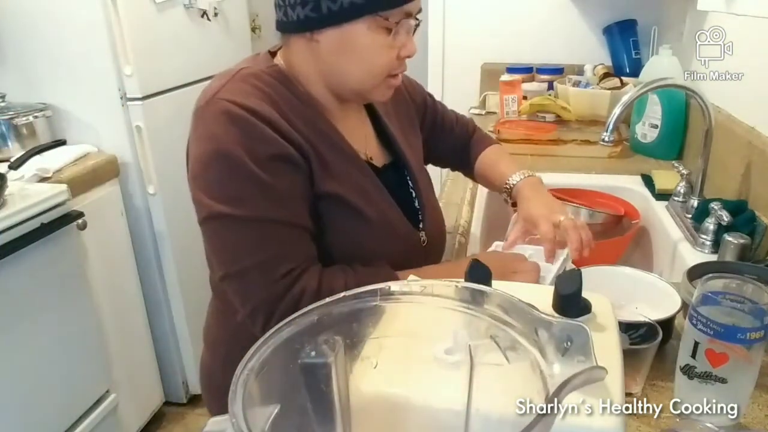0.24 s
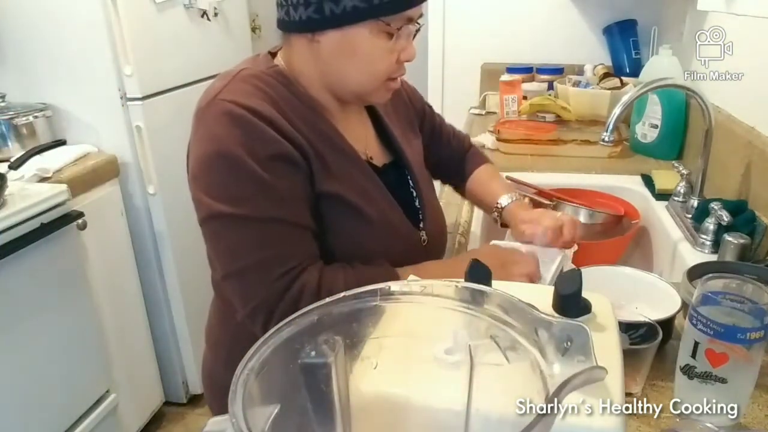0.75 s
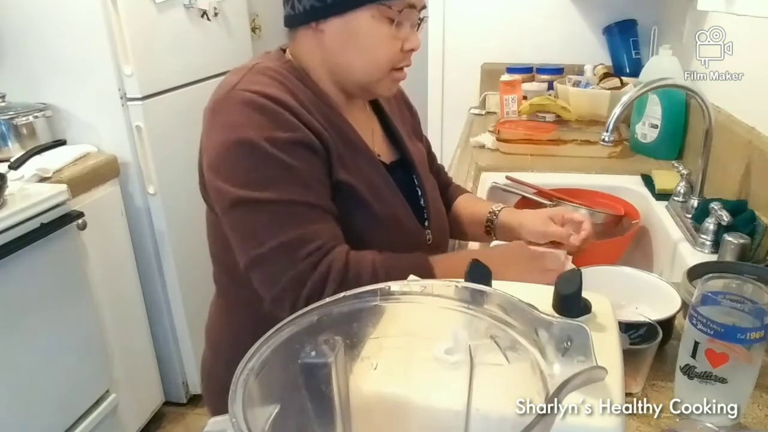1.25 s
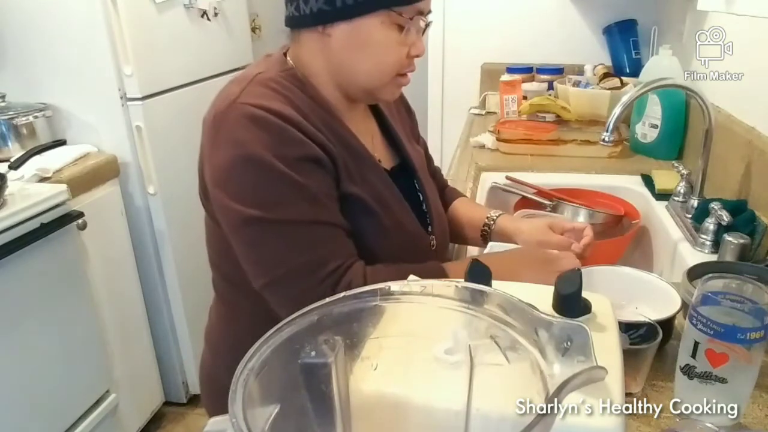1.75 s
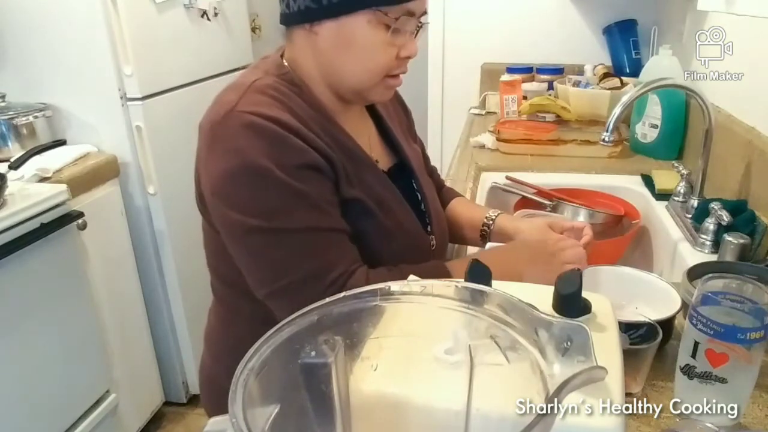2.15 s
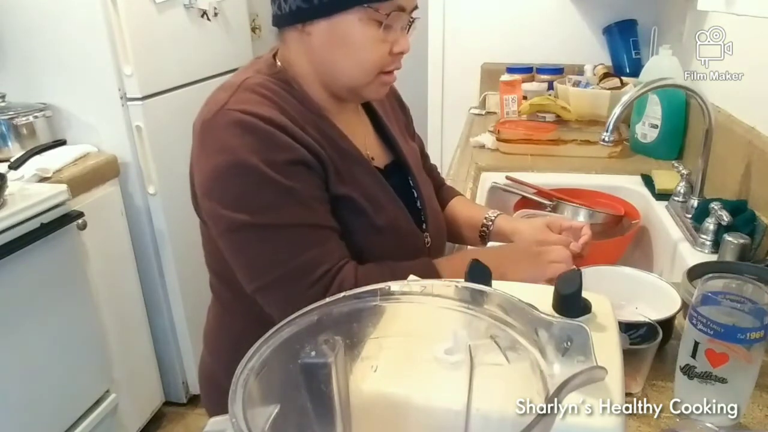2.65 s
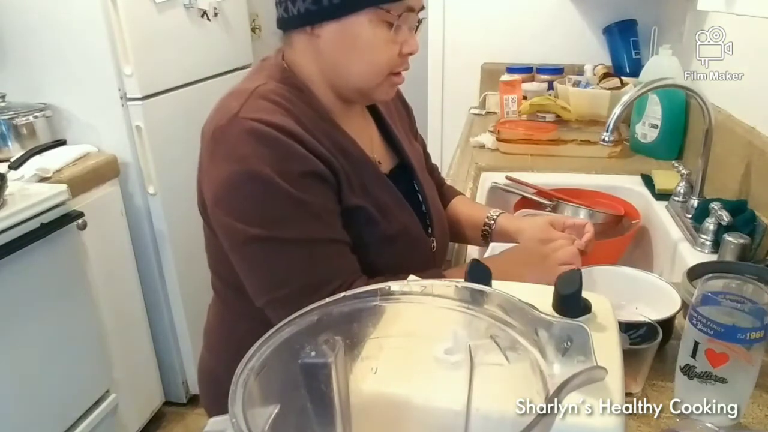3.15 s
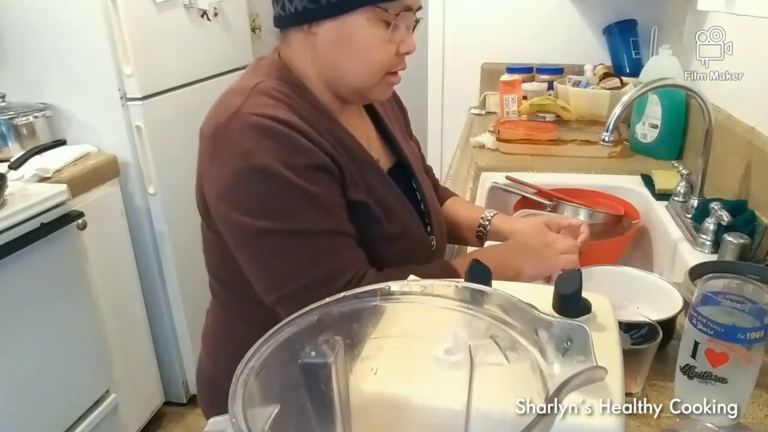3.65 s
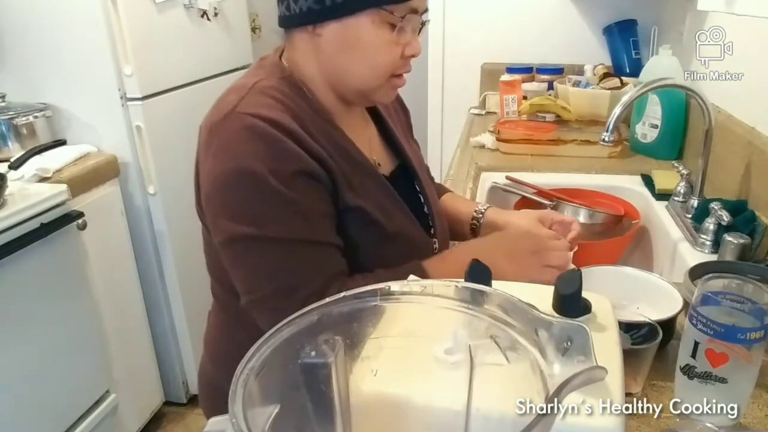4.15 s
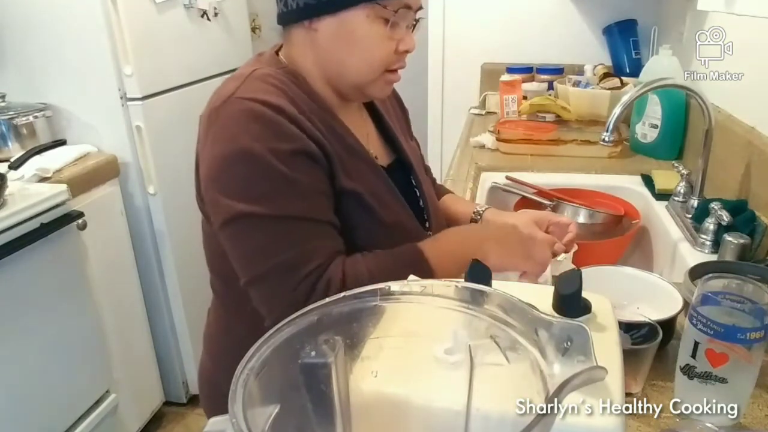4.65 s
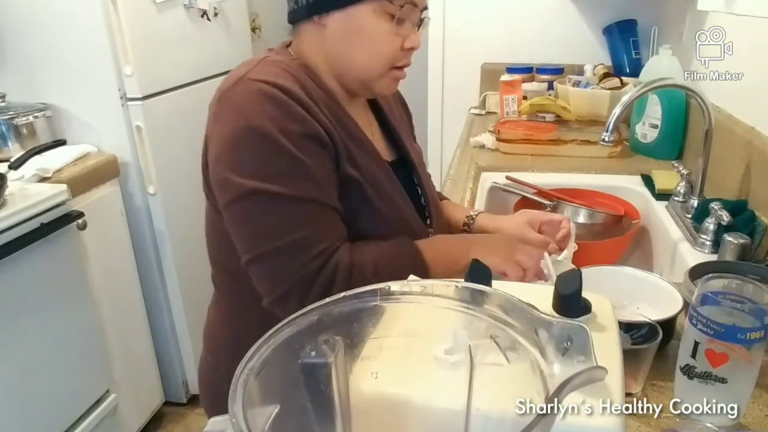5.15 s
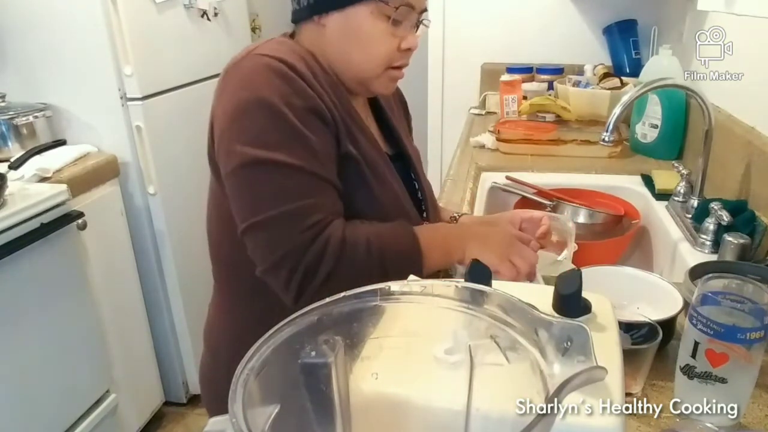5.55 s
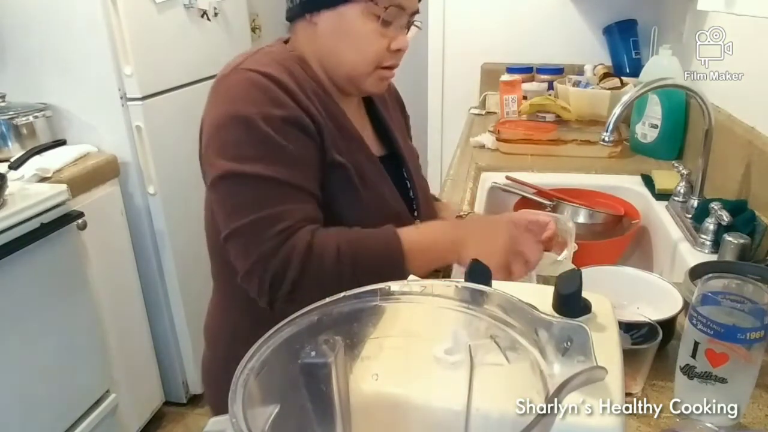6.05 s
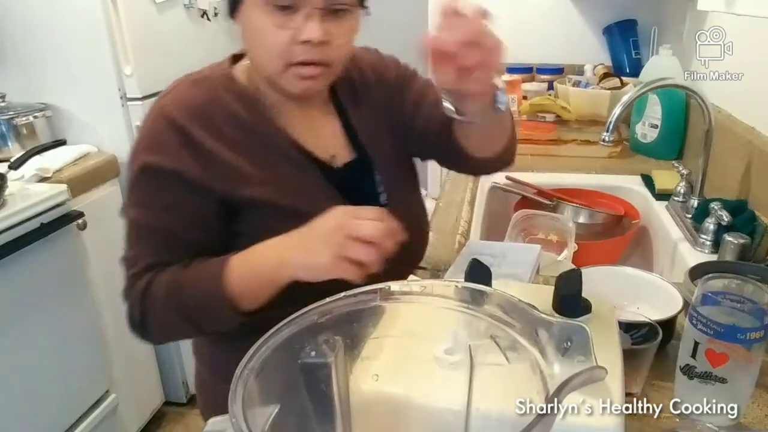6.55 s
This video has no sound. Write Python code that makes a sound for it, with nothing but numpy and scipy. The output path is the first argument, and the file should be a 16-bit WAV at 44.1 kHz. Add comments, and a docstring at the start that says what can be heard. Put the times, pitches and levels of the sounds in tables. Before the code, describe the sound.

Ice cubes crack and snap loose as a plastic tray is twisted by hand over a sink in a small, hard-walled kitchen.

```python
"""Twisting an ice tray over a sink

A plastic ice tray is twisted over a kitchen sink: cubes crack loose in snaps and short stick-slip runs.
Each crack is a train of broadband clicks that rings damped modes of a cube and of the tray.
Reflections of the small hard room outweigh the direct clicks; once, the tray gives way with a hollow bump.
Fingers grip and rub the frosty plastic in sparse random grains, over a faint hiss of filtered noise.
A noise gate turns the quietest moments down, and a low-pass limits the band."""
import sys
import numpy as np
from scipy import signal
from scipy.fft import rfft, irfft, next_fast_len
from scipy.io import wavfile
from scipy.ndimage import uniform_filter1d

SR = 44100
rng = np.random.default_rng(int(sys.argv[2]) if len(sys.argv) > 2 else 0)


def store_pcm(level_fs):
    """Save levels as 16-bit WAV."""
    pcm = np.round(np.clip(level_fs, -1, 1) * 32767).astype(np.int16)
    wavfile.write(sys.argv[1], SR, np.atleast_2d(pcm).T)


N = 300551  # length in samples


def amp(db):
    """Level to amplitude: 20 dB is a factor of ten."""
    return 10 ** (np.asarray(db) / 20)


def unit(x):
    """Power normalisation: x at rms 1."""
    return x / np.sqrt(np.mean(x ** 2) + 1e-20)


def unit_energy(x):
    """Energy normalisation: x with a sum of squares of 1."""
    return x / np.sqrt(np.sum(x ** 2) + 1e-20)


def along(points, hz):
    """Logarithmic frequency scale: (Hz, value) points interpolated over log frequency."""
    point_hz, value = np.transpose(points)
    return np.interp(np.log(hz + 1), np.log(point_hz + 1), value)


def coloured(x, spectrum, size=4096):
    """Minimum-phase filtering: folding the cepstrum gives this spectrum a causal response."""
    level_db = along(spectrum, np.fft.rfftfreq(size, 1 / SR))
    cepstrum = irfft(np.log(amp(np.maximum(level_db, -100))))
    cepstrum[1:size // 2] *= 2
    cepstrum[size // 2 + 1:] = 0
    response = irfft(np.exp(rfft(cepstrum)))
    return signal.fftconvolve(x, response)[:len(x)]


# Spectrum of the quiet room, relative: frequency_hz [Hz], density_db [dB per Hz]
HISS_SPECTRUM = [(30, -14.5), (200, 3), (3000, -15), (8000, -14), (13000, -31)]


def hiss(level_db=-73):
    """Stationary noise: random pressure filtered to the spectrum of the quiet room."""
    return amp(level_db) * unit(coloured(rng.standard_normal(N), HISS_SPECTRUM))


# Reverberation time of the kitchen: frequency_hz [Hz], t60_s [s]
ROOM_DECAY = [(150, 0.47), (500, 0.24), (1100, 0.29), (2800, 0.26), (8000, 0.25)]


def kitchen(size=256):
    """Diffuse reverberation: a fresh noise tail in which each frequency decays at its own rate."""
    hz = np.fft.rfftfreq(size, 1 / SR)
    t = np.arange(SR // size + 1) * size / 2 / SR  # frames half a window apart
    shape = (len(hz), len(t))
    noise = rng.standard_normal(shape) + 1j * rng.standard_normal(shape)
    decay = amp(-60 * t / along(ROOM_DECAY, hz)[:, None])
    return unit_energy(signal.istft(noise * decay, nperseg=size)[1])


# Grips of the fingers on the tray: start_s [s], length_s [s], level_db [dB]
FINGER_GRIPS = [(-0.03, 0.82, -55.5), (0.858, 0.14, -53.5), (1.129, 0.14, -62), (1.314, 0.64, -57),
                (2.063, 0.59, -56.5), (2.773, 0.17, -56), (3.1, 0.14, -60), (3.335, 0.946, -61.5),
                (4.464, 0.19, -59.5), (4.77, 0.81, -53.5), (5.56, 1.1, -61)]


def grip(t, attack_s=0.016, ease_db_per_s=5.5, release_db_per_s=164):
    """Amplitude envelope: each grip takes hold quickly, eases while it lasts and lets go."""
    envelope = 0
    for start_s, length_s, level_db in FINGER_GRIPS:
        since = t - start_s
        attack = np.clip(since / attack_s, 0, 1)
        release_db = release_db_per_s * np.maximum(since - length_s, 0)
        envelope = envelope + attack * amp(level_db - ease_db_per_s * since - release_db)
    return envelope


# Spectrum of the rubbing, relative: frequency_hz [Hz], density_db [dB per Hz]
FROST_SPECTRUM = [(50, -18), (130, -3), (350, 2.5), (1400, -1.5), (2300, 0), (4200, -9.5), (8000, -5.5),
                  (12500, -29)]


def rubbing(rate_per_s=500, spread_db=4, dry_db=-12, catch_hz=45, catch_db=3.5):
    """Friction as random micro-slips of skin and frost, bunched where fingers catch, blurred by the room."""
    t = np.arange(N) / SR
    catches = np.interp(t * catch_hz, np.arange(N), rng.standard_normal(N))  # slow random swell
    size = amp(spread_db * rng.standard_normal(N) + catch_db * catches)
    slips = rng.random(N) < rate_per_s / SR
    grains = slips * rng.standard_normal(N) * size
    heard = amp(dry_db) * grains + signal.fftconvolve(grains, kitchen())[:N]
    return grip(t) * unit(coloured(heard, FROST_SPECTRUM))


def flex(start_s=0.553, hz=208, t60=0.083, level_db=-12):
    """Damped resonance with a gradual onset: the twisted tray gives way once with a hollow bump."""
    t = np.maximum(np.arange(N) / SR - start_s, 0)
    return amp(level_db) * unit_energy(t * amp(-60 * t / t60) * np.sin(2 * np.pi * hz * t))


def ring(t, hz, db, t60):
    """Modal superposition: exponentially damped sines, each with db as its share of the energy."""
    hz, db, t60 = np.array(np.broadcast_arrays(hz, db, t60))[:, :, None]
    strength = amp(db - 60 * t / t60) / np.sqrt(t60)  # a longer mode starts softer for the same energy
    return unit_energy(np.sum(strength * np.sin(2 * np.pi * hz * t), axis=0))


# Resonances of the tray: frequency_hz [Hz], level_db [dB, relative energy], t60_s [s]
TRAY_MODES = [(219.4, 6, 0.24), (388.5, -2.5, 0.19), (1000, 3, 0.064), (1158.4, 6, 0.055),
              (1623, -11.5, 0.16), (2087, 7, 0.07), (3214, 9, 0.089)]


def tray_ring(t, scatter_db=3):
    """Modal excitation: the tray's fixed modes are struck at new strengths each time."""
    hz, db, t60 = np.transpose(TRAY_MODES)
    return ring(t, hz, db + scatter_db * rng.standard_normal(len(db)), t60)


def cube_ring(t, low_hz=500, high_hz=11000, count=20, low_t60=0.22, scatter=0.2):
    """Frequency-dependent damping: cube and cell get fresh modes, the high ones mostly dying first."""
    position = (np.arange(count) + rng.random(count)) / count
    hz = low_hz * (high_hz / low_hz) ** position
    share_db = 10 * np.log10(hz)  # high modes lie further apart, so each carries more
    t60 = low_t60 * np.sqrt(low_hz / hz) * np.exp(scatter * rng.standard_normal(count))
    return ring(t, hz, share_db, t60)


def click(early_t60=0.3, early_db=-2, direct_db=-11):
    """Impulse response: direct click, reflections from the near walls of the sink, room tail."""
    tail = kitchen()
    t = np.arange(len(tail)) / SR
    near = rng.standard_normal(len(t))
    near *= np.abs(near) * amp(-60 * t / early_t60)  # a few strong reflections stand out
    return amp(direct_db) * (t == 0) + amp(early_db) * unit_energy(near) + tail


def crack(length, first_db=2.5, soften_db_per_s=200, spread_db=1.5, tray_db=-13, cube_db=-8, count=7):
    """Stick-slip fracture: one break runs on in uneven slips, each with its own reflections."""
    when = (np.arange(count) + rng.random(count) - 1) / (count - 1) * abs(length)
    size_db = spread_db * rng.standard_normal(count)
    when[0], size_db[0] = 0, first_db - soften_db_per_s * length  # long runs creep in, short ones burst
    sound = np.zeros(SR // 2)
    for start, db in zip((when * SR).astype(int), size_db):
        slip = amp(db) * click()[:len(sound) - start]
        sound[start:start + len(slip)] += slip
    sound = unit_energy(sound)
    t = np.arange(SR // 4) / SR
    ringing = amp(tray_db) * tray_ring(t) + amp(cube_db) * cube_ring(t)
    biggest = int(when[np.argmax(size_db)] * SR)
    sound[biggest:][:len(t)] += ringing  # the biggest slip rings cube and tray
    return sound


# Basic spectrum of a crack, relative: frequency_hz [Hz], density_db [dB per Hz]
ICE_SPECTRUM = [(30, -65), (75, -41.5), (120, -19), (210, -14.5), (390, -2.5), (520, -7), (720, -4.5),
                (1100, -2.5), (2250, -3.5), (4000, -14), (6000, -18), (7900, -13), (9500, -22.5),
                (13000, -42), (15500, -44.5)]
# Band in which a splitting cube rings: frequency_hz [Hz], share [0-1]
SPLIT_BAND = [(550, 0.32), (900, 0.88), (2400, 0.7), (3400, 0.5), (5000, 0.4)]
# Colour that the taut tray adds: frequency_hz [Hz], gain_db [dB]
TAUT_COLOUR = [(200, 1), (400, -2.5), (1100, -2.5), (2150, 4.5), (3200, -1.5), (5000, 3.5), (8000, -0.5),
               (12000, -2)]
TILT_LOW_HZ, TILT_HIGH_HZ = 450, 8000  # brightness tips the colour between these
HARD_FROM_DB, HARD_DB_PER_DB = 1, 1.97  # a crack stronger than this splits its cube
TWIST_END_S = 0.8  # until here both hands hold the tray taut, which sharpens its cracks


def ice_colour(start_s, db, brightness):
    """Spectral tilt: crisp ice tips it up, dull plastic down; a split cube or taut tray rings harder."""
    hz = np.geomspace(30, SR / 2, num=200)
    tilt_db = brightness * np.log2(np.clip(hz, TILT_LOW_HZ, TILT_HIGH_HZ) / TILT_LOW_HZ)
    split_db = HARD_DB_PER_DB * max(db - HARD_FROM_DB, 0) * along(SPLIT_BAND, hz)
    taut_db = (start_s < TWIST_END_S) * along(TAUT_COLOUR, hz)
    return np.transpose([hz, along(ICE_SPECTRUM, hz) + tilt_db + split_db + taut_db])


# Single snaps of ice and plastic:
# start_s [s], energy_db [dB], brightness [dB per octave]
ICE_SNAPS = [(0.06, -15.5, 5), (0.08, -17.5, -4.5), (0.207, -3.5, 4), (0.409, -8, 8), (0.545, -0.5, 0.5),
             (0.563, 2, 1), (0.887, -4.5, -1.5), (1.141, -26.5, 0.5), (1.466, -17, -5), (1.543, 9.5, 0.5),
             (1.668, -9, -1.5), (2.248, -3, 3), (2.286, 2.5, 0.8), (2.519, -13, 1.8), (2.612, -12, -2),
             (2.72, -15, -4), (2.892, -21, 11), (3.138, -11, -3.5), (3.446, -1, -3), (3.669, -7, -2),
             (3.712, -12.5, -2), (3.758, 0, -2.5), (3.846, -2, 1.5), (4.081, -24, 3), (4.449, -19.5, 4),
             (4.55, -16.5, 7), (4.566, -11, -3.5), (4.76, -19, -1), (4.804, -3.5, 1.1), (4.893, 1, -2),
             (4.954, 5.5, -1.5), (5.148, -12.5, -3), (5.16, -8, 0.6), (5.262, -8.5, -3.5), (5.555, -11, -3),
             (5.591, -3, -0.3), (5.722, -6.5, -3), (5.787, -10.5, -1.8), (6.086, -4, 1.5), (6.308, -7, -2),
             (6.496, -14.5, -2)]
# Stick-slip runs of a cube working loose:
# start_s [s], length_s [s], energy_db [dB], brightness [dB per octave]
SLIP_RUNS = [(0.311, 0.046, -16.5, 19), (0.466, 0.024, -4.5, 5.5), (0.695, 0.036, -7.5, 0.5),
             (0.73, .025, -8, 5.5), (0.866, 0.039, -13, -10), (1.358, 0.023, -14.5, 0),
             (2.15, 0.033, -17.5, 4.5), (2.207, 0.028, -9, -2.5), (2.269, 0.023, 12, 4),
             (2.76, .024, -13.5, -3.5), (3.026, 0.029, -5, -1), (3.061, 0.011, 3, 2.5),
             (3.479, 0.014, 0.5, 1.5), (3.515, 0.017, 0, 0), (3.57, 0.019, 5.5, -2), (3.639, .013, -8.5, 0),
             (3.794, 0.0056, -1, 0.2), (3.813, .01, -3.5, 2.5), (4.121, 0.028, -11.5, -6),
             (4.145, .014, -3, -2.5), (4.785, 0.039, -15.5, 4.5), (4.915, .04, -4.5, 0.5),
             (5.3, .045, -9.5, 0), (5.367, 0.024, -9, 2), (5.437, 0.015, -9, 2), (5.9, 0.013, 3.5, 3.1),
             (6.21, 0.02, -8.5, -3), (6.364, 0.014, -9.5, -2), (6.419, 0.023, -15.5, 4.5),
             (6.565, 0.041, -26.5, -8.5)]
SNAP_S = 0.0013  # the slips of a snap fall within this time


def cracks():
    """Brittle fracture: snaps and runs are the same breaking, short or drawn out."""
    out = np.zeros(N + SR)
    snaps = [(start_s, SNAP_S, db, brightness) for start_s, db, brightness in ICE_SNAPS]
    for start_s, length_s, db, brightness in snaps + list(SLIP_RUNS):
        colour = ice_colour(start_s, db, brightness)
        sound = amp(db) * unit_energy(coloured(crack(length_s), colour))
        out[round(start_s * SR):][:len(sound)] += sound
    return out[:N]


def scene():
    """Linear superposition: hiss, rubbing, the tray's bump and the cracks add at one microphone."""
    return (hiss() + rubbing() + flex() + cracks())[None]


def record(dry, gate_db=-72, gate_ratio=3.5, gate_depth_db=8, gate_s=0.02, top_hz=15550):
    """Downward expansion and band limiting: quiet moments are turned down, the top is cut off."""
    power = uniform_filter1d(dry ** 2, int(gate_s * SR))
    level_db = 10 * np.log10(np.abs(power) + 1e-20)
    gain_db = np.clip(gate_ratio * (level_db - gate_db), -gate_depth_db, 0)
    gated = dry * amp(gain_db)
    m = next_fast_len(N + SR // 2)
    passed = np.fft.rfftfreq(m, 1 / SR) < top_hz
    return irfft(rfft(gated, m) * passed, m)[:, :N]


dry = scene()
out = record(dry)
store_pcm(out)
```